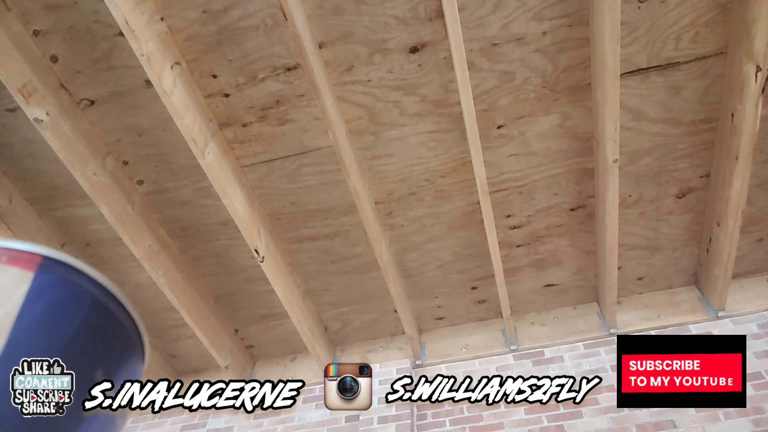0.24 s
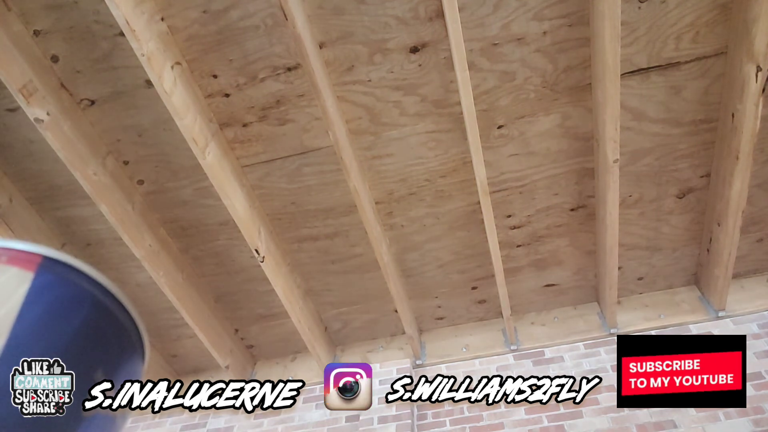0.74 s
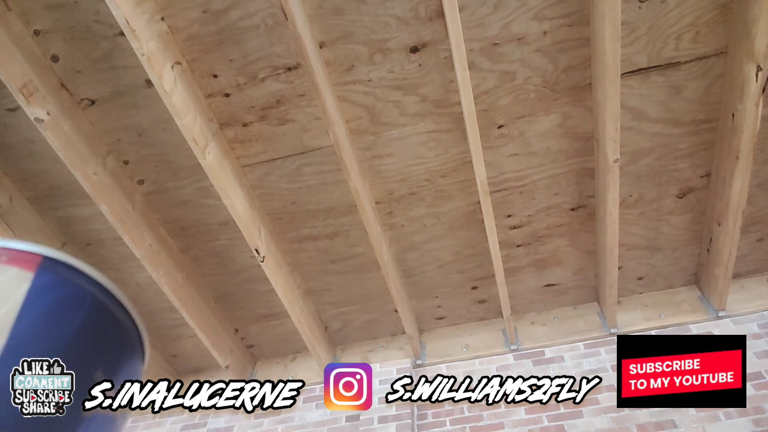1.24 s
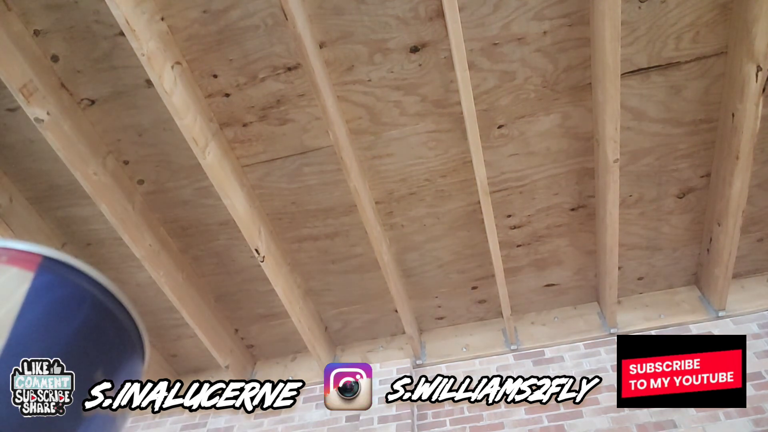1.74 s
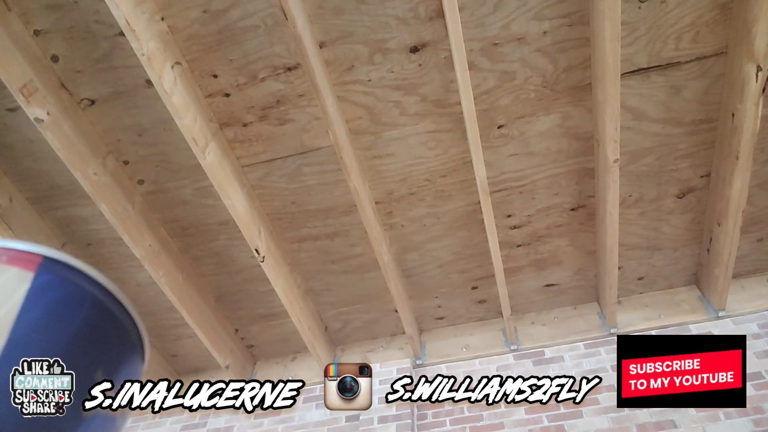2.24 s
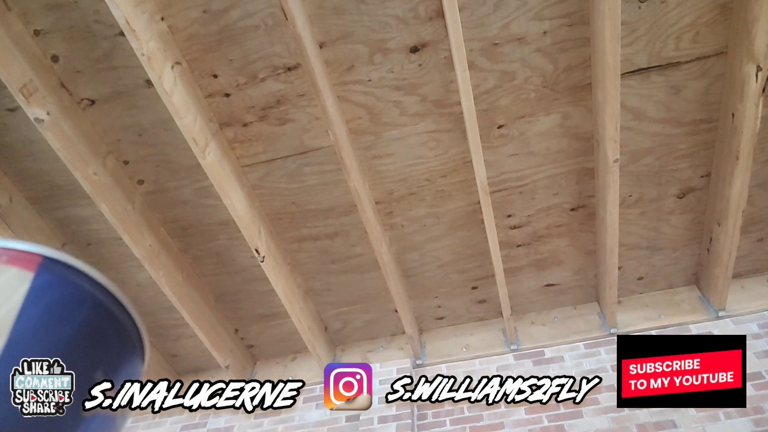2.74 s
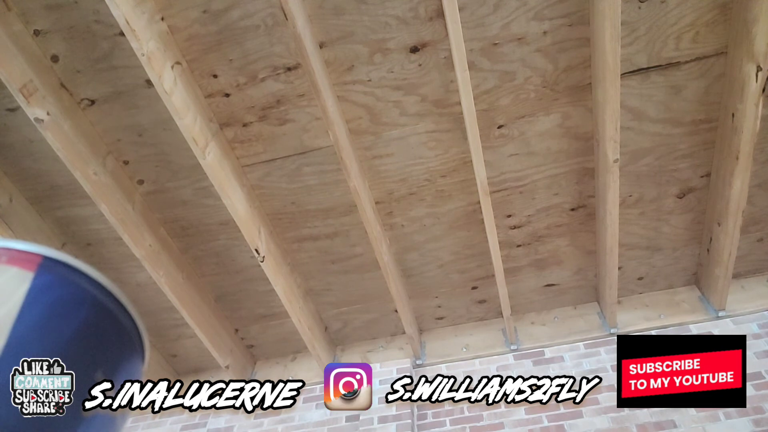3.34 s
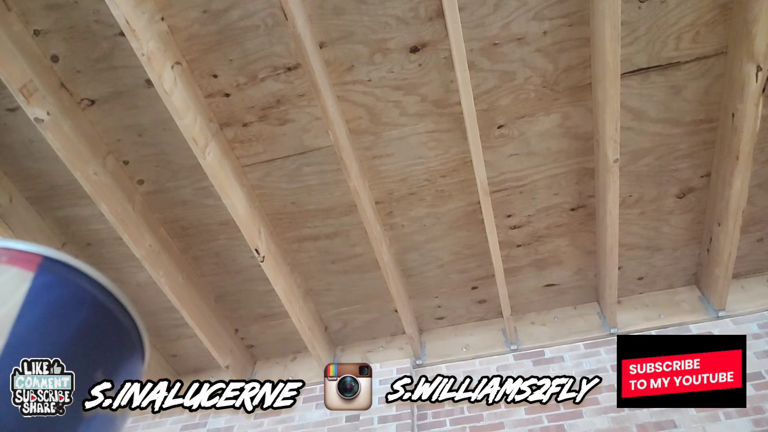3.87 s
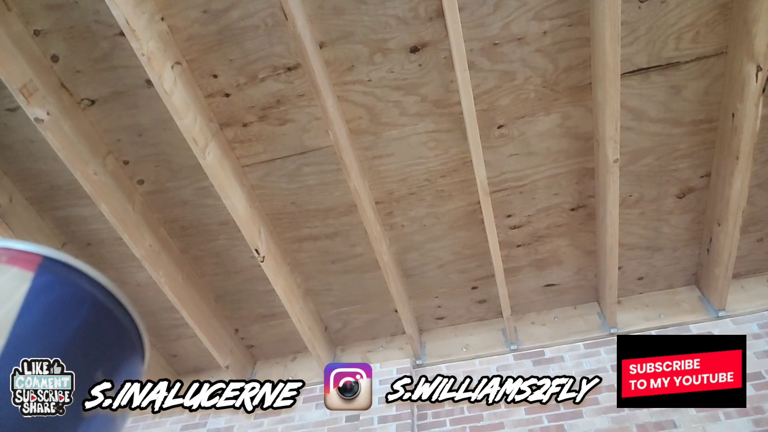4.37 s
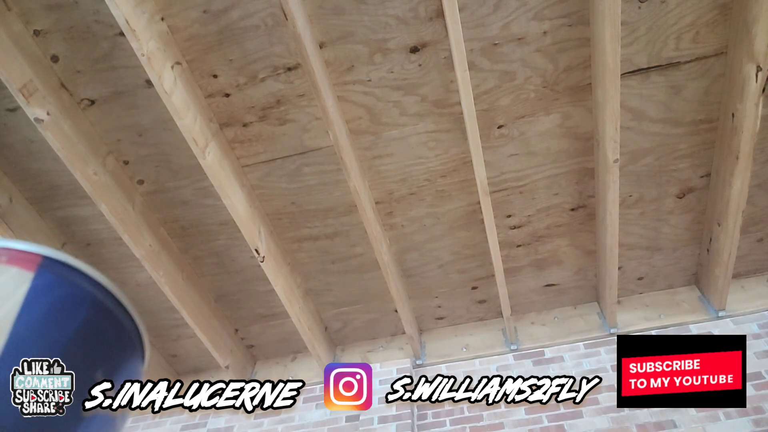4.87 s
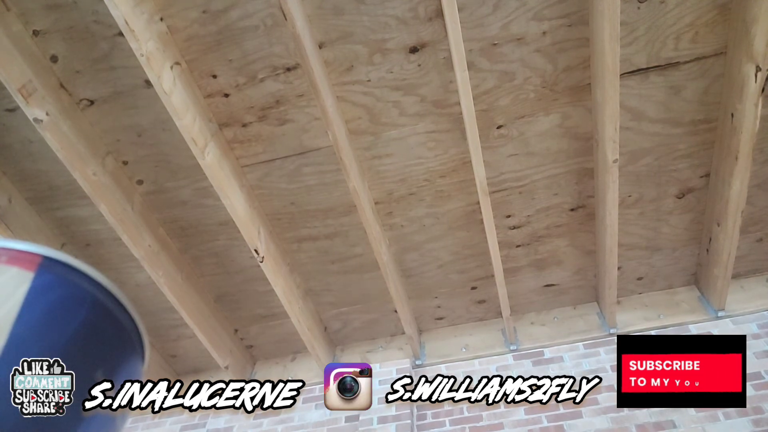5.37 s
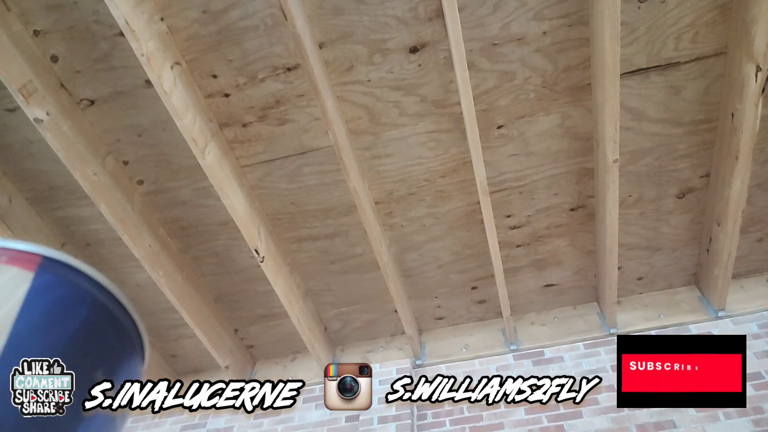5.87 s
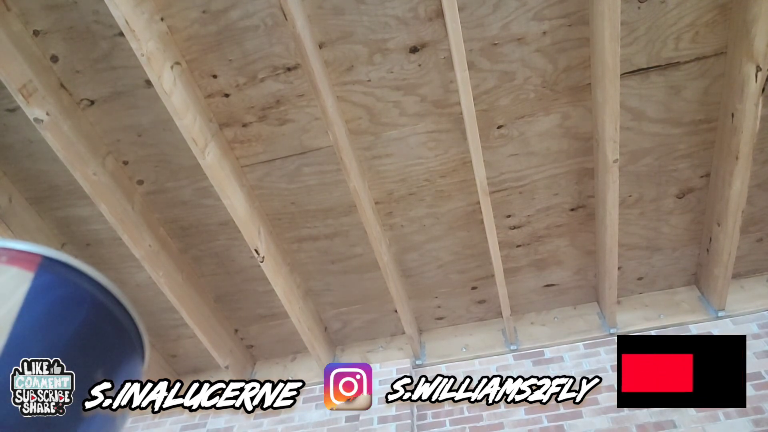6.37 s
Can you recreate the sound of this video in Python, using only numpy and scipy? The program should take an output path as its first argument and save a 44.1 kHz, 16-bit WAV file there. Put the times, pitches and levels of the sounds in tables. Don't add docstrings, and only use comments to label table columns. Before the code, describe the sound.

Over a low motor hum in a garage, a door thuds, keys jingle and click at a lock, then a car door slams heavily.

```python
import sys
import numpy as np
from scipy import signal
from scipy.fft import rfft, irfft, next_fast_len
from scipy.io import wavfile
from scipy.ndimage import uniform_filter1d, map_coordinates

SR = 44100
rng = np.random.default_rng(int(sys.argv[2]) if len(sys.argv) > 2 else 0)


def store_pcm(level_fs):
    pcm = np.round(np.clip(level_fs, -1, 1) * 32767).astype(np.int16)
    wavfile.write(sys.argv[1], SR, np.atleast_2d(pcm).T)


def gain_from_decibels(decibels):
    exponent = np.asarray(decibels, float) / 20
    return 10 ** exponent


N = 291663


def unit(x):
    return x / np.sqrt(np.mean(x ** 2) + 1e-20)


def along(points, hz):
    f, v = np.transpose(points)
    return np.interp(np.log(hz + 1), np.log(f + 1), v)


def wobble(count):
    knots = rng.standard_normal(int(N * count / SR) + 4)
    return map_coordinates(knots, [np.arange(N) * count / SR], order=2)


def filtered(x, response):
    m = next_fast_len(x.shape[-1] + SR // 2)
    return irfft(rfft(x, m) * response(np.fft.rfftfreq(m, 1 / SR)), m)[..., :x.shape[-1]]


def modes(table):
    return lambda f: sum(gain_from_decibels(db) * 1j * f * w / (c * c - f * f + 1j * f * w) for c, w, db in table)


def colour(spectrum):
    return lambda hz: gain_from_decibels(along(spectrum, hz))


def diffuse(response, pair):
    # frequency in Hz, likeness 0-1.
    alike = [(60, 0.65), (180, .97), (330, .8), (550, 0.3), (1650, 0), (4970, 0.01), (15000, 0)]

    def mix(hz):
        turn = np.arccos(np.clip(along(alike, hz), -1, 1)) / 2
        return response(hz) * [np.cos(turn), np.sin(turn)]

    mid, side = filtered(pair, mix)
    return unit(np.array([mid + side, mid - side]))


def add(track, s, piece):
    part = track[..., round(s * SR):][..., :piece.shape[-1]]
    part += piece[..., :part.shape[-1]]


def burst(db, rise_s, t60_s):
    t = np.arange(SR // 4) / SR
    return gain_from_decibels(db - 60 * t / np.clip(t60_s, .005, .3)) * (1 - np.exp(-(t / max(rise_s, 1e-4)) ** 2))


def swarm(grain_db, patchy_db):
    z = signal.stft(rng.standard_normal((2, N)), nperseg=256)[2]
    field = uniform_filter1d(rng.standard_normal(z.shape[-2:]), size=2, axis=0)
    field = uniform_filter1d(field, size=5, axis=1)
    noise = signal.istft(z * gain_from_decibels(patchy_db * unit(field)), nperseg=256)[1][:, :N]
    return noise * gain_from_decibels(grain_db * wobble(count=400))


def ring_pan(hz):
    # frequency in Hz, left over right in dB.
    pan = [(5000, 10), (7200, 21), (11000, 13), (11900, -1), (13500, 4.5), (15500, 5.5)]
    return gain_from_decibels(along(pan, hz) * np.array([[.5], [-.5]]))


def clinks():
    # peak time in seconds, peak in dB, lower band above upper in dB.
    swings = [(0.2, -67, 3), (0.3, -62, -2), (0.325, -64, 3.5), (0.35, -69, 2), (0.7547, -58.5, 1.5),
              (1.6935, -61.5, 9), (1.827, -61.5, 3.5), (4.0078, -65, -4), (4.1285, -60.5, -3.5),
              (4.323, -44, -3.5), (4.474, -55, -5), (4.7097, -61, 1.5), (4.898, -47, -7),
              (4.918, -52, -7.5), (5.158, -50, 2), (5.171, -35, 8.5), (5.205, -53, 7.5), (5.3697, -62, 1),
              (5.448, -61, -3), (5.6292, -59, -5), (5.8157, -58.5, -3.5), (5.968, -48, -5),
              (5.992, -51, -5), (6.089, -57.5, -6), (6.2367, -57.5, -4), (6.5228, -64, 0)]
    sorting = [(2.105, -57.5, 0), (2.144, -55, 1), (2.1725, -47, -5), (2.226, -41, -12), (2.2618, -40, -14),
               (2.2894, -38, -27), (2.4594, -44, -24), (2.5446, -38, -14.5), (2.6484, -47, -30),
               (2.637, -49, -21), (2.817, -57, -25), (3.0594, -58, -13), (3.075, -57, -17),
               (3.0994, -50, -11), (3.3807, -62, 0.5), (3.503, -34, -8), (3.511, -26, -6),
               (3.519, -19, -6.5), (3.535, -32, 1), (3.552, -47, -15), (3.5994, -46.5, -5), (3.726, -58, 8),
               (3.7994, -59, -2), (3.8831, -58, 0)]
    # start in seconds, peak in dB, lower band above upper in dB.
    ticks = [(0.1765, -63, 5), (0.509, -65, -9), (0.652, -63, -5), (1.8985, -58, -2.5), (2.148, -54, 0),
             (2.2044, -43, -10), (2.339, -42, -8), (2.9135, -52, -10), (2.962, -53, -10), (3.198, -53, -9),
             (4.4935, -51, -5), (4.9035, -43, -7), (4.9745, -62, 12), (5.981, -54, -5)]
    clink_rise_s, tick_rise_s = .012, .0045
    clink_t60_s, hard_dies_db = .13, 0.205
    low, high = np.zeros((2, N))
    for s, db, low_db in swings + sorting:
        t60_s = clink_t60_s * gain_from_decibels(-hard_dies_db * (db + 42.5))
        add(high, s - 1.15 * clink_rise_s, burst(db, clink_rise_s, t60_s))
        add(low, s - 1.2 * clink_rise_s, burst(db + low_db + 0.57, clink_rise_s, t60_s))
    for s, db, low_db in ticks:
        t60_s = clink_t60_s * gain_from_decibels(-hard_dies_db * (db + 46))
        add(high, s, burst(db, tick_rise_s, t60_s))
        add(low, s, burst(db + low_db, tick_rise_s, t60_s))
    return low, high


def shakes():
    # start in seconds, peak in seconds, peak in dB, swell in dB/s, fade in dB/s.
    jingles = [
        (2.154, 2.453, -53, 52, 35),
        (3.379, 3.635, -50, 67.5, 88),
        (5.946, 6.14, -65.5, 4, 79),
    ]
    fleck_low_hz, fleck_high_hz = 3500, 15700
    fleck_db, fleck_scatter_db = -4, 1.5
    fleck_t60_s, fleck_spread_s = 0.058, 0.76
    total, flecks = np.zeros(N), []
    for start, peak, db, swell, fade in jingles:
        late = np.arange(N) / SR - peak
        level = gain_from_decibels(db + np.minimum(swell * late, -fade * late)) * (late > start - peak)
        total += level
        when, pitch, size = rng.uniform(size=(3, 70))
        when = np.minimum(start + 2 * fleck_spread_s * when, N / SR - .3)
        hz = fleck_low_hz + pitch * (fleck_high_hz - fleck_low_hz)
        level_db = 20 * np.log10(level[(when * SR).astype(int)])
        level_db += fleck_db + fleck_scatter_db * (2 * size - 1)
        flecks += [(s, f, d, fleck_t60_s) for s, f, d in zip(when, hz, level_db)]
    return total, flecks


def ringing_keys(flecks):
    # start in seconds, frequency in Hz, level in dB, t60 in seconds.
    singles = [(0.658, 7150, -49, 0.037), (1.9, 5080, -56, 0.055), (2.284, 14500, -51, 0.1),
               (2.289, 7060, -49.5, 0.073), (2.342, 11700, -44, 0.065), (2.4, 5930, -54, 0.078),
               (2.434, 11960, -42, 0.12), (2.458, 8540, -58, 0.14), (2.469, 10860, -45.5, 0.062),
               (2.487, 14000, -54, 0.07), (2.545, 15500, -48, 0.092), (2.671, 11830, -42.5, 0.28),
               (2.689, 6860, -61, 0.1), (2.69, 15200, -58, 0.35), (2.818, 11300, -58, 0.29),
               (2.855, 15000, -57, 0.09), (3.114, 15400, -58, 0.15), (3.112, 7100, -61.5, 0.15),
               (3.146, 13900, -42, 0.096), (3.514, 10660, -34.5, 0.058), (3.665, 10340, -61, 0.12),
               (3.833, 5100, -59.5, 0.2), (3.874, 11930, -59, 0.13), (4.497, 15500, -46, 0.07),
               (4.53, 15400, -67, 0.23), (4.325, 7150, -57, 0.072), (4.315, 6700, -61, 0.067),
               (4.5, 12200, -60, 0.12), (4.502, 7100, -39, 0.025), (4.782, 13750, -56, 0.13),
               (5.035, 13750, -53, 0.15), (5.06, 13750, -51, 0.11), (5.228, 13820, -52, 0.2),
               (5.235, 13200, -64, 0.2), (3.137, 5880, -57, 0.091), (6.243, 11950, -65, 0.24),
               (0.657, 11910, -59, 0.087), (0.657, 10300, -69, 0.068), (2.15, 5880, -37.5, 0.037),
               (2.21, 11800, -47, 0.1), (2.21, 7000, -54, 0.11), (2.458, 15500, -54, 0.15),
               (2.465, 13100, -50, 0.25), (2.635, 13400, -48, 0.2), (2.647, 14700, -46, 0.088),
               (2.822, 15300, -63, 0.3), (2.828, 7130, -63, 0.07), (2.83, 6150, -71, 0.23),
               (2.858, 6600, -66, 0.1), (2.885, 7050, -67, 0.28), (2.963, 3500, -60, 0.1),
               (3.105, 11300, -57, 0.06), (3.15, 13200, -55, 0.08), (5.518, 12000, -60, 0.17),
               (5.81, 12000, -75, 0.088)]
    rise_s, swell = .011, .12
    caught, caught_db_per_s = .3, 900
    rings, t = np.zeros((2, N)), np.arange(SR // 4) / SR
    for s, hz, db, t60_s in singles + flecks:
        jitter = np.cumsum(rng.normal(0, .009, len(t)))
        turns = hz * t + rng.uniform(size=(2, 1)) + jitter
        damped = gain_from_decibels(-caught_db_per_s * np.maximum(t - caught * t60_s, 0))
        envelope = burst(db + 9.5, max(rise_s, swell * t60_s), t60_s) * damped
        add(rings, s - .006, envelope * np.sin(2 * np.pi * turns) * ring_pan(hz))
    return rings * gain_from_decibels(2.8 * wobble(count=200))


def keys():
    # frequency in Hz, level in dB per Hz.
    key_low = [(2060, -22.5), (3500, -7), (5320, -7.5), (6050, -8.5), (6890, -4), (9500, -20), (12400, -47),
               (20900, -120)]
    key_high = [(5590, -52), (9500, -19), (11700, -1.5), (12500, -1.5), (15000, -1), (16000, -7)]
    # frequency in Hz, width in Hz, level in dB.
    bunch = [(4860, 11.4, -6), (5800, 30, -8), (6160, 10, -1), (6700, 11.2, 0), (7150, 19, 2),
             (10600, 13, -5), (10700, 13.2, -9), (11700, 14, -5), (11950, 9, 6), (13100, 14, -14),
             (13750, 20, -7), (15500, 30, -4)]
    bunch_db = 11
    low, high = clinks()
    level, flecks = shakes()
    high, low = high + level, low + gain_from_decibels(-6.5) * level
    rings = ringing_keys(flecks)
    rattle = swarm(grain_db=2, patchy_db=5)
    hard = gain_from_decibels(bunch_db) * np.hypot(high, low) * unit(rattle)
    woken = filtered(hard, lambda hz: modes(bunch)(hz) * ring_pan(hz))
    rings = rings + woken / np.sqrt(SR / 1000)
    rustle = low * diffuse(colour(key_low), rattle) * gain_from_decibels([[4], [-4]])
    rustle = rustle + high * diffuse(colour(key_high), rattle) * gain_from_decibels([[.8], [-.8]])
    return rustle, rings


def ringing_parts():
    # start in seconds, frequency in
    # Hz, level in dB, t60 in seconds.
    door_and_lock_parts = [(0.104, 380, -39, 0.17), (0.129, 334, -24.5, 0.043), (0.1345, 2540, -32, 0.07),
                           (0.134, 3200, -42.5, 0.1), (0.134, 1600, -40, 0.08), (0.15, 1180, -30, 0.065),
                           (.15, 500, -53, 0.13), (0.16, 2260, -40.5, 0.099), (0.195, 3350, -45, 0.064),
                           (0.17, 2400, -40, 0.07), (0.77, 3220, -48, 0.13), (0.8, 2900, -46, 0.093),
                           (0.71, 1850, -54, 0.06), (0.766, 420, -45, 0.052), (0.791, 500, -46, 0.1),
                           (0.76, 5200, -51, 0.05), (1.05, 471, -41, 0.05), (2.168, 2400, -49, 0.094),
                           (2.338, 6160, -35, 0.043), (2.345, 3600, -51, 0.043), (2.3398, 6900, -37, 0.012),
                           (4.496, 6760, -48, 0.012), (3.51, 2175, -36.5, 0.17), (3.5141, 5800, -15.5, 0.011),
                           (3.5147, 8200, -15, 0.0047), (3.515, 8500, -24, 0.0049), (3.5155, 14000, -18, 0.01),
                           (3.593, 10800, -39, 0.01), (3.518, 5300, -20.5, 0.015), (3.53, 6820, -49, .06),
                           (3.594, 5900, -43, 0.035), (4.519, 1130, -46, 0.23), (3.54, 830, -39, 0.17),
                           (5.15, 550, -23, 0.13), (5.1563, 730, -10.5, 0.0094), (5.168, 500, -21, 0.085),
                           (5.165, 830, -32, 0.072), (5.18, 210, -21, 0.12), (5.175, 930, -28, 0.06),
                           (5.204, 930, -23, 0.07), (5.167, 6600, -32, 0.02), (5.205, 745, -29, 0.24),
                           (5.215, 2061, -23.5, 0.046), (5.25, 370, -30.5, 0.14), (5.255, 206.5, -28, 0.44),
                           (5.2, 301.6, -26.5, 0.16), (5.38, 53, -31, 0.35), (3.795, 3270, -55, 0.04),
                           (3.519, 8900, -25, 0.0091), (3.536, 7300, -30, 0.012), (5.255, 198, -30, 0.2),
                           (3.52, 1062, -42, 0.16),
                           (5.1555, 260, -20, .06), (5.176, 240, -17, .05), (5.203, 250, -19, .06), (5.214, 190, -22, .09),
            (5.26, 320, -29, .2), (5.3, 205, -33, .3), (5.17, 1000, -22, .03), (5.44, 48, -34, .3),
            (5.17, 530, -24, .04), (4.52, 620, -47, .1), (5.55, 50, -40, .3)]
    snap_s = .016
    lead_s, off_axis_s = .0004, 0.0001
    steady_hz, rise_per_t60 = 1300, .035
    parts, t = np.zeros((2, N)), np.arange(SR // 4) / SR
    shake = wobble(count=150)
    for s, hz, db, t60_s in door_and_lock_parts:
        rings_on = t60_s > snap_s
        lead = min(hz * lead_s, .25) + rng.normal(0, min(hz * off_axis_s, .1))
        turns = hz * t + np.array([[.5], [-.5]]) * lead * rings_on
        flutter = gain_from_decibels(4.8 * (hz > steady_hz) * rings_on * shake[round(s * SR):][:len(t)])
        add(parts, s, flutter * burst(db, rise_per_t60 * t60_s, t60_s) * np.sin(2 * np.pi * turns))
    return parts


def knocks():
    # peak in seconds, panel in dB, latch over panel in dB, t60 in s.
    hits = [(0.133, -25, -17.5, 0.26), (0.148, -30, -11, 0.073), (0.192, -35, -2.5, 0.076),
            (0.756, -38.5, -3.5, 0.15), (0.793, -34, -18, 0.23), (0.882, -46, -40, 0.34),
            (1.693, -49, -2.5, 0.24), (2.169, -59, 9.5, 0.19), (2.343, -57.5, 7.5, 0.37),
            (3.379, -50.5, 7, 0.096), (3.506, -38.5, 0.5, 0.42), (3.599, -31, -18, 0.097),
            (3.728, -36.5, 0, 0.093), (1.99, -39, -28, 0.19), (3.792, -35, -10, 0.078),
            (3.88, -44.5, -39, 0.34), (4.486, -45, -30, 0.33), (4.505, -46, -32, 0.18),
            (4.522, -40.5, -13, 0.18), (4.905, -50.5, 3, 0.12), (4.96, -31, -10.5, 0.1),
            (4.973, -36, 0, 0.11), (5.141, -20, -20, 0.11), (5.155, -12, -22.5, 0.16),
            (5.17, -8.5, -9, 0.089), (5.189, -19, -2, 0.086), (5.212, -14, -15.5, 0.14)]
    # frequency in Hz, level in dB per Hz.
    panel_spectrum = [(70, -35), (150, -4), (250, -9.5), (306, -4.5), (350, -13.5), (430, -17), (502, -6.5),
                      (624, -17), (1500, -22.5), (1950, -25), (3300, -120)]
    latch_spectrum = [(300, -36), (760, -14.5), (1300, -14.5), (1920, -9.5), (2080, -7.5), (3340, -11.5),
                      (3800, -20), (5190, -21), (8000, -44), (10400, -46), (17600, -120)]
    rise_s = 0.022
    panel, latch = np.zeros((2, N))
    for s, db, latch_db, t60_s in hits:
        add(panel, s - 0.67 * rise_s, burst(db - 2, rise_s, t60_s))
        add(latch, s - 0.72 * rise_s, burst(db + latch_db + 6.5, rise_s, t60_s))
    parts = ringing_parts()
    rattle = swarm(grain_db=1.5, patchy_db=1.0)
    dull = panel * diffuse(colour(panel_spectrum), rattle)
    return dull + latch * diffuse(colour(latch_spectrum), rattle) + parts


def boom():
    # start in seconds, level in dB, frequency in Hz (negative pulls first), length in cycles.
    pushes = [(0.11, -38, 112, 1.4), (0.125, -27.5, 101.5, 2.4), (3.52, -68, 99, 1.7),
              (5.156, -13.5, 79, 1.27), (5.175, -20.5, -150, 3.3), (5.193, -8, -85.5, 1.68),
              (5.201, -19.5, -70, 1.2), (5.219, -30, -85, 1.57), (5.248, -37, 76, 1.1),
              (5.282, -29, 75, 1.3), (5.306, -28, -79, 1.8)]
    # frequency in Hz, width in Hz, level in dB.
    air_modes = [(49, 3, 4), (67.4, 10.3, 7), (109, 13, 2), (167.5, 20, 2), (213, 17, 22), (270, 17, 8),
                 (320, 14, 5)]
    across_modes = [(61, 8, -10.5), (88.5, 4.5, -8), (132, 72, 1), (183, 11, -7)]
    left_leads_s, lead_fades_hz = .0009, 135
    push = np.zeros(N)
    for s, db, hz, cycles in pushes:
        t = np.arange(round(cycles / abs(hz) * SR)) / SR
        window = np.sin(np.pi * abs(hz) * t / cycles) ** 2
        add(push, s, gain_from_decibels(db) * np.sin(2 * np.pi * hz * t) * window)
    ring, across = filtered(push, lambda hz: [modes(air_modes)(hz), gain_from_decibels(-15) * modes(across_modes)(hz)])

    def lead(hz):
        turns = left_leads_s * hz / (1 + (hz / lead_fades_hz) ** 2)
        return np.exp(2j * np.pi * turns * [[1], [-1]])

    return filtered(push + ring + across * [[1], [-1]], lead)


def garage(x):
    # frequency in Hz, t60 in seconds.
    decay = [(100, 0.53), (1000, 0.42), (4000, 0.44), (8000, 0.22), (15000, 0.42)]
    hz, t, z = signal.stft(rng.standard_normal((2, SR // 2)), SR, nperseg=256)
    tail = signal.istft(z * gain_from_decibels(-60 * t / along(decay, hz)[:, None]), SR, nperseg=256)[1]
    tail = diffuse(np.ones_like, np.pad(tail, ((0, 0), (400, 0))))
    tail = tail / np.linalg.norm(tail, axis=1, keepdims=True)
    return signal.oaconvolve(x, tail, axes=1)[:, :N]


def background():
    # start in seconds, level in dB, t60 in seconds.
    rumbles = [
        (.17, -34, 0.36),
        (3.75, -45.5, 0.72),
        (5.24, -35.5, 0.72),
    ]
    # time in seconds, level in dB.
    motor_line = [(0.0, -51), (0.27, -58), (0.59, -49), (0.85, -56.5), (1.12, -47.5), (1.62, -62),
                  (1.9, -44), (2.28, -62), (3.05, -49), (3.35, -52), (4.12, -48), (4.57, -52.5),
                  (5.38, -49.5), (5.84, -53), (6.22, -50), (6.61, -57)]
    # frequency in Hz, width in Hz, level in dB.
    casing = [(77.6, 5.6, 0)]
    # frequency in Hz, level in dB.
    air_spectrum = [(15, -49), (25, -17.5), (85, -9.5), (115, -4), (146, -12), (294, -18), (325, -16.5),
                    (389, -16.5), (485, -21.5), (1020, -24), (3000, -33.5), (3900, -76), (6600, -120)]
    hiss_spectrum = [(1500, -5), (2600, -4.5), (3200, -3.5), (4300, -8.5), (5400, -12), (7500, -20.5),
                     (8500, -29.5), (10500, -29), (13000, -22.5), (16000, -28)]
    motor_hz, wander_cycles, casing_db = 113.4, 0.26, -55.5
    murmur_db, drift_db, hiss_db, rumble_rise_s = -50.5, 1, -61.5, 0.12
    air, motor = rng.standard_normal((2, 2, N))
    t = np.arange(N) / SR
    level = gain_from_decibels(murmur_db + drift_db * wobble(count=2))
    for s, db, t60_s in rumbles:
        rise = 1 - np.exp(-(t[:SR] / rumble_rise_s) ** 2)
        add(level, s, gain_from_decibels(db - 60 * t[:SR] / t60_s) * rise)
    line = np.sqrt(2) * np.sin(2 * np.pi * (motor_hz * t + wander_cycles * wobble(count=5)))
    line_db = np.interp(t, *np.transpose(motor_line)) + 1.1 * wobble(count=12)
    hum = gain_from_decibels(line_db) * line + gain_from_decibels(casing_db) * diffuse(modes(casing), motor)
    murmur = level * diffuse(colour(air_spectrum), air)
    return murmur + gain_from_decibels(hiss_db) * diffuse(colour(hiss_spectrum), motor) + hum


def scene():
    (rustle, rings), wood, thump = keys(), knocks(), boom()
    wet = gain_from_decibels(-9.5) * rustle[:1] + gain_from_decibels(-16) * rings[:1] + gain_from_decibels(-5) * wood[:1] + gain_from_decibels(-14) * thump[:1]
    return rustle + rings + wood + thump + garage(wet) + background()


def low_pass(x):
    return signal.sosfilt(signal.butter(12, 15790, fs=SR, output="sos"), x)


def record(dry):
    bass_cut_hz, top_hz = 32, 15790
    heard = filtered(dry, lambda hz: (hz < top_hz) * (1j * hz / (bass_cut_hz + 1j * hz)))
    return low_pass(heard)


dry = scene()
out = record(dry)
store_pcm(out)
```